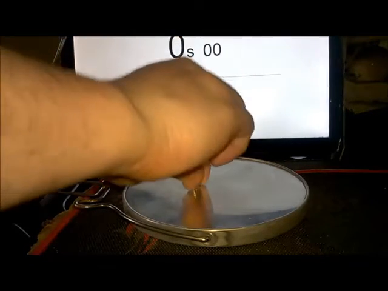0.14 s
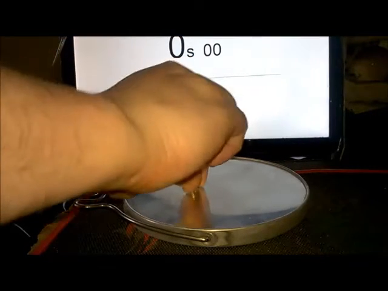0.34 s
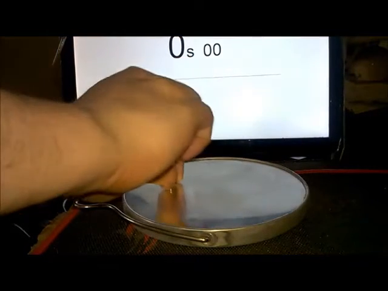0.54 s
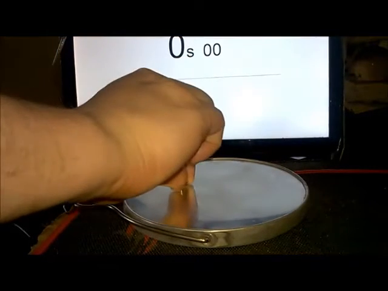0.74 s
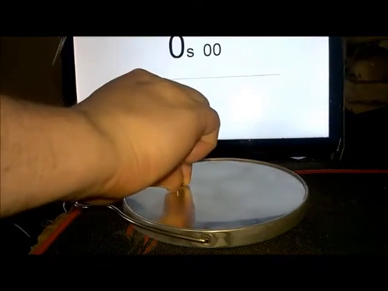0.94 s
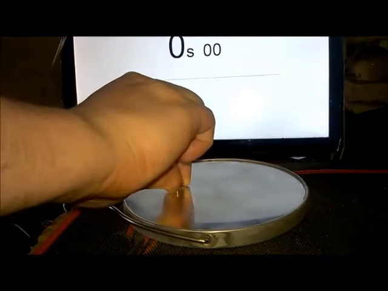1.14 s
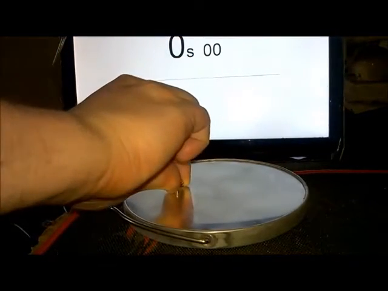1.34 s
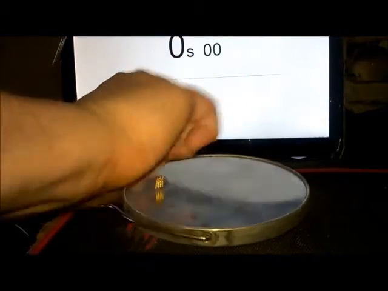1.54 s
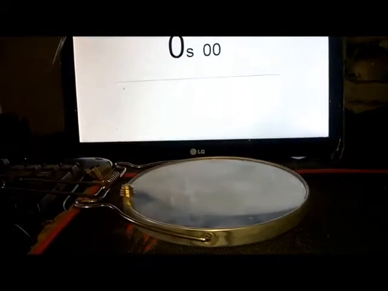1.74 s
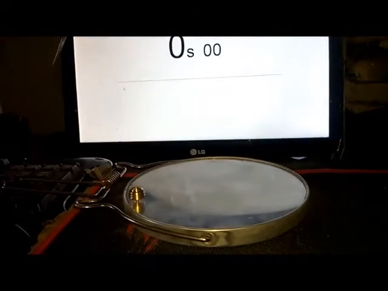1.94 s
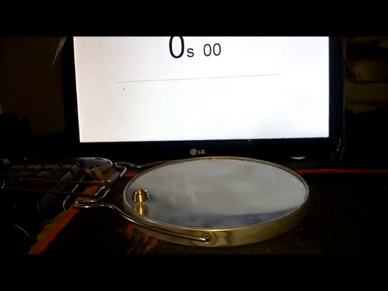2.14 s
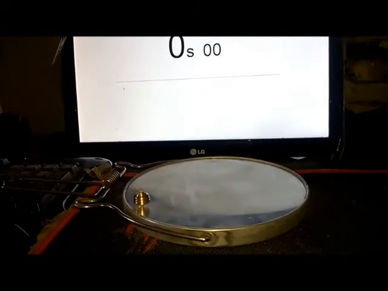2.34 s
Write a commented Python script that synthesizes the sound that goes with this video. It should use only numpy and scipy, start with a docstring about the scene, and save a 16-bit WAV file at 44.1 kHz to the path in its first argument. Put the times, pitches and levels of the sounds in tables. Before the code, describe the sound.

Close up in a quiet small room, a little metal top snaps hard onto a glass mirror, bounces in a bright quarter-second clatter, ticks the metal rim, and leaves faint microphone hiss and a barely audible whirr.

```python
"""A tiny top on a glass mirror

A tiny metal top is set down on a round glass mirror and flicked: it lands hard, skids with a thin ring,
bounces in a rapid run, ticks against the metal rim and ends in a barely audible whirr. Glass, metal and table
are sums of dying sine waves; cracks, ticks, chatter, whirr and microphone hiss are filtered noise.
A small, dead, quiet room adds a short noise echo."""
import sys
import numpy as np
from scipy import signal
from scipy.fft import rfft, irfft
from scipy.io import wavfile

SR = 44100
rng = np.random.default_rng(int(sys.argv[2]) if len(sys.argv) > 2 else 0)


def inscribe(sig):
    """Save sig as 16-bit PCM at rate SR to the path in sys.argv[1].

    A 1-D sig is mono; a 2-D sig holds one channel per row.
    Samples are clipped to [-1, 1] before scaling.
    """
    pcm = np.round(np.clip(np.atleast_2d(sig).T, -1, 1) * 32767)
    wavfile.write(sys.argv[1], SR, pcm.astype(np.int16))


N = 109456  # length in samples, about 2.5 s

# Steady microphone hiss. Each row: frequency in Hz, relative strength in dB per Hz.
HISS_COLOUR = [(12, -42.5), (20, -11), (49, -4.5), (107, -0.5), (149, -5.5), (192, -2.5), (233, -7),
               (419, -6.5), (456, -10), (2060, -13.5), (3910, -17.5), (6840, -18), (15800, -25.5)]
HISS_DB = -61
# Tone of the room's echo. Each row: frequency in Hz, relative strength in dB.
ECHO_COLOUR = [(100, -2.5), (500, -5), (2000, 0.5), (5500, -2), (9000, 3.5), (16000, 3)]
ROOM_DB, ROOM_GAP_S, ROOM_BUILD_S, ROOM_T60_S = -8.5, .005, 0.0071, .125
# Low modes of the table, which thuds under the flick.
# Each row: frequency in Hz, level in dB, time to fall 60 dB in seconds.
TABLE_MODES = [(38, -45.5, 0.247), (70, -40, .1), (122, -36, .08), (180, -43.5, 0.12)]
THUD_S = 1.528
# Resonances in which the tip whirrs. Each row: frequency in Hz, width in octaves, level in dB at the swell's peak.
WHIRR_BANDS = [(2497, 0.18, -67.5), (4120, 0.029, -71), (4850, .05, -75.5)]
WHIRR_PEAK_S, WHIRR_SPREAD_S = 2.4, .11
# The tip set down on the glass under the fingers.
# Each row: frequency in Hz, level in dB, time to fall 60 dB in seconds.
TOUCH_MODES = [(935, -50, 0.024), (1590, -49.5, 0.017), (2530, -42.5, .016), (3300, -43, 0.0081),
               (5700, -51.5, .014)]
TOUCH_S = 0.4126
# Loudness of the tip's fine chatter between the blows. Each row: time in seconds, level in dB.
CHATTER_LEVELS = [(1.55, -34), (1.63, -35), (1.72, -38), (1.752, -46), (1.78, -39), (1.798, -45),
                  (1.804, -62)]
# Tone of the chatter. Each row: frequency in Hz, relative strength in dB.
CHATTER_TONE = [(350, -9), (550, 8.5), (1300, -6), (1800, 2), (2600, -7.5), (4400, -3), (5500, -1),
                (7200, -13.5), (10000, -23.5), (12000, -30), (16000, -46)]
CHATTER_PER_S, CHATTER_T60_S, CHATTER_SCATTER_DB = 700, 0.012, 1.5
# Short dry ticks of the top against the rim. Each row: start in seconds, level in dB before filtering.
RIM_TICKS = [(1.7597, -11.5), (1.7666, -3.5)]
TICK_HZ, TICK_OCTAVES, TICK_T60_S = 5150, .33, .004
TICK_ROOM_DB = -2  # how much of the ticks the room receives
# Ring of the metal as the top skids off the fingers.
# Each row: frequency in Hz, level in dB before flutter, time to fall 60 dB in seconds.
METAL_MODES = [(1005, -31.5, 0.14), (1520, -43.5, 0.096), (2960, -29.5, 0.16), (3970, -41.5, .15),
               (4740, -27.5, 0.13), (7410, -22, 0.18), (8700, -34.5, .17), (10100, -32.5, .12),
               (10520, -28.5, 0.12), (12520, -49, .1), (13100, -40.5, 0.13), (15480, -46, 0.19)]
FLUTTER_DEPTH, FLUTTER_HZ = 0.98, 55
SKID_S, SKID_LENGTH_S, SKID_DB = 1.545, 0.025, -31
# Blows of the top on the glass. Each row: start in seconds, level in dB, brightness in dB per octave,
# knock of the mirror's body in dB relative to the blow's level.
BLOWS = [(1.5275, -28, -6, -5), (1.5329, 1.5, .5, -22), (1.5437, -8, 0, -8), (1.5468, -9, 2, -8),
         (1.5565, -13, 0, -12), (1.5605, -14, 0, -8), (1.5642, -13, -2, -3), (1.5887, -3.5, -.5, -3),
         (1.6068, -3.5, 0, -3), (1.6184, -6, .5, -2), (1.6254, -15, 0, 1), (1.6298, -18, 0, 1),
         (1.6371, -8.5, .5, -3), (1.647, -16, 0, -2), (1.6587, -11.5, .5, -3), (1.6698, -12, .5, -3),
         (1.6798, -15, .5, -1), (1.6898, -17, .5, 0), (1.6986, -23, 0, 4), (1.7096, -20.5, 0, 3),
         (1.7195, -20, 0, 3), (1.7296, -25, -1, 7), (1.7632, -26, -1, 9), (1.769, -26, -1, 16),
         (1.7772, -15.5, -1, 2), (1.7895, -31, 0, -1)]
# Modes of the glass plate.
# Each row: frequency in Hz before detuning, level in dB relative to the blow, time to fall 60 dB in seconds.
GLASS_MODES = [(984, -15, 0.017), (1547, -14.5, 0.02), (1924, -14.5, .016), (2350, -28, 0.0093),
               (3155, -10, 0.015), (3458, -11, 0.013), (4666, -6.5, 0.012), (4874, -11, 0.026),
               (5390, -13.5, 0.026), (6050, -24, 0.017), (6620, -12.5, .012), (7650, -15.5, 0.016),
               (8600, -26.5, 0.021), (9960, -25.5, 0.015)]
# Low modes of the mirror in its frame.
# Each row: frequency in Hz before detuning, level in dB relative to the knock, time to fall 60 dB in seconds.
BODY_MODES = [(432, -20, 0.027), (534, -13, 0.051), (607, -16.5, .025), (700, -20.5, 0.029),
              (844, -21, 0.047)]
GLASS_ATTACK_S = 0.00074
DETUNE = .006  # random pitch spread, as a fraction of the frequency
# Noise of hard contact, for blows and skid. Each row: frequency in Hz, relative strength in dB per Hz.
CRACK_COLOUR = [(200, -19), (500, -4), (1500, 1), (5000, 1.5), (7000, -3.5), (9000, -15), (11200, -13),
                (12000, -21), (13500, -20.5), (16000, -43)]
CRACK_DB, CRACK_T60_S = -6.5, 0.014
CONTACT_HZ, CONTACT_OCTAVES_PER_DB = 13500, .022  # treble limit of a 0 dB blow; its shift with level
LOW_CUT_HZ = 315  # the sounds on the mirror are cut off steeply below this
TOP_HZ = 15850  # nearly nothing is heard above this


def undb(db):
    """Turn decibels into a gain."""
    return 10 ** (np.asarray(db) / 20)


def shaped(x, gain):
    """Filter a sound by a gain that depends on frequency."""
    hz = np.maximum(np.fft.rfftfreq(N, 1 / SR), 1)
    return irfft(rfft(x) * gain(hz), N)


def colour(points):
    """Gain drawn through (Hz, dB) points, evenly spaced by octave."""
    hz, db = np.array(points).T
    return lambda f: undb(np.interp(np.log(f), np.log(hz), db))


def hump(hz, octaves):
    """Gain of one resonance, strongest at its centre."""
    return lambda f: 1 / (1 + (np.log2(f / hz) / octaves) ** 2)


def noise(gain):
    """Coloured noise with an average (rms) level of 1."""
    x = shaped(rng.standard_normal(N), gain)
    return x / x.std()


def age(start):
    """Seconds since a moment, zero before it."""
    return np.maximum(np.arange(N) / SR - start, 0)


def fade(t, t60):
    """Smooth decay by 60 dB in t60 seconds, silent until t leaves zero."""
    return (t > 0) * np.exp(-np.minimum(np.log(1000) * t / t60, 60))


def ring(modes, start, detune=0):
    """A struck object: dying sine waves, whose neighbours swing in opposite directions."""
    first = int(start * SR)
    t = age(start)[first:first + SR // 2]  # half a second at most
    out = np.zeros(N)
    for k, (hz, db, t60) in enumerate(modes):
        pitch = hz * (1 + detune * rng.standard_normal())
        wave = np.sin(2 * np.pi * pitch * t)
        out[first:first + len(t)] += (-1) ** k * undb(db) * fade(t, t60) * wave
    return out


def hiss():
    """The microphone's steady noise."""
    return undb(HISS_DB) * noise(colour(HISS_COLOUR))


def room(x):
    """Dense reflections that build up after a short gap and die away."""
    t = age(ROOM_GAP_S)
    build_up = 1 - np.exp(-t / ROOM_BUILD_S)
    tail = noise(colour(ECHO_COLOUR)) * fade(t, ROOM_T60_S) * build_up
    tail = tail / np.linalg.norm(tail)
    return undb(ROOM_DB) * signal.fftconvolve(x, tail)[:N]


def thud():
    """The table answers the flick with a few low, damped modes."""
    return ring(TABLE_MODES, THUD_S)


def whirr():
    """The tip rubs faintly in a few resonances, swelling and fading while the top rights itself."""
    swell = np.exp(-((age(0) - WHIRR_PEAK_S) / WHIRR_SPREAD_S) ** 2 / 2)
    rubbing = sum(undb(db) * noise(hump(hz, octaves)) for hz, octaves, db in WHIRR_BANDS)
    return swell * rubbing


def touch():
    """The tip is set down on the glass and excites a few short modes."""
    return ring(TOUCH_MODES, TOUCH_S)


def chatter():
    """Hundreds of tiny random contacts a second as the wobbling tip runs over the glass."""
    hits = rng.random(N) < CHATTER_PER_S / SR
    contacts = hits * undb(CHATTER_SCATTER_DB * rng.standard_normal(N))
    click = rng.standard_normal(N) * fade(age(0), CHATTER_T60_S)
    grains = shaped(signal.fftconvolve(contacts, click)[:N], colour(CHATTER_TONE))
    when, db = np.array(CHATTER_LEVELS).T
    level = undb(np.interp(age(0), when, db, left=-np.inf, right=-np.inf))  # silent outside the table
    return grains / grains.std() * level


def ticks():
    """Metal on metal: bright bursts of noise that die within milliseconds."""
    envelope = sum(undb(db) * fade(age(start), TICK_T60_S) for start, db in RIM_TICKS)
    bursts = rng.standard_normal(N) * envelope
    return shaped(bursts, lambda f: np.exp(-(np.log2(f / TICK_HZ) / TICK_OCTAVES) ** 2 / 2))


def skid():
    """The spinning metal scrapes the glass for a moment and rings on, each partial fluttering by itself."""
    t = age(SKID_S)
    scrape = noise(colour(CRACK_COLOUR)) * (t > 0) * np.exp(-(t / SKID_LENGTH_S) ** 2)
    out = undb(SKID_DB) * scrape
    for mode in METAL_MODES:
        flutter = noise(lambda f: 1 / (1 + (f / FLUTTER_HZ) ** 2))  # slow random wavering
        out = out + ring([mode], SKID_S) * (1 + FLUTTER_DEPTH * flutter)
    return out


def bounces():
    """Each blow cracks, rings the glass and knocks the mirror's body; harder blows keep more treble."""
    out = 0
    for start, db, tilt_db, knock_db in BLOWS:
        t = age(start)
        rise = 1 - np.exp(-t / GLASS_ATTACK_S)
        burst = rng.standard_normal(N) * fade(t, CRACK_T60_S)
        crack = undb(CRACK_DB) * shaped(burst, colour(CRACK_COLOUR))
        corner = CONTACT_HZ * 2 ** (CONTACT_OCTAVES_PER_DB * db)

        def contact(f):
            """Tilt the tone around 3500 Hz and cut it above the corner."""
            tilt = undb(tilt_db * np.log2(np.maximum(f, 700) / 3500))
            return tilt / np.hypot(1, (f / corner) ** 4)

        plate = shaped(ring(GLASS_MODES, start, DETUNE) * rise + crack, contact)
        knock = undb(knock_db) * ring(BODY_MODES, start, DETUNE) * rise
        out = out + undb(db) * (plate + knock)
    return out


def low_cut(f):
    """Gain that leaves the sounds on the mirror steeply weaker in the bass."""
    return 1 / np.sqrt(1 + (LOW_CUT_HZ / f) ** 8)


def scene():
    """The top on its mirror, the room and the steady hiss."""
    mirror = shaped(touch() + chatter() + skid() + bounces(), low_cut)
    rim = ticks()
    near = thud() + whirr() + rim + mirror
    echo = room(mirror + undb(TICK_ROOM_DB) * rim)  # thud and whirr get no echo
    return (hiss() + echo + near)[None]


def record(dry):
    """Cut the highest treble off steeply."""
    low_pass = signal.ellip(10, .2, 70, TOP_HZ, fs=SR, output="sos")
    return signal.sosfilt(low_pass, dry)


dry = scene()
out = record(dry)
inscribe(out)
```